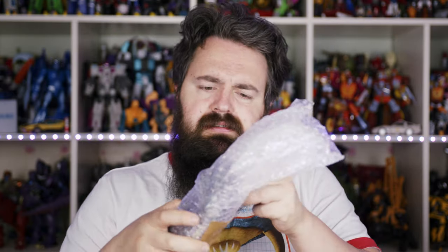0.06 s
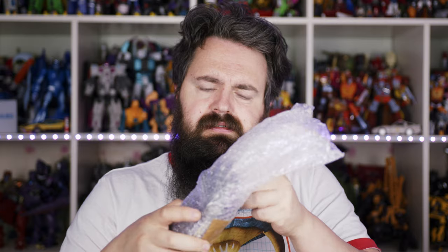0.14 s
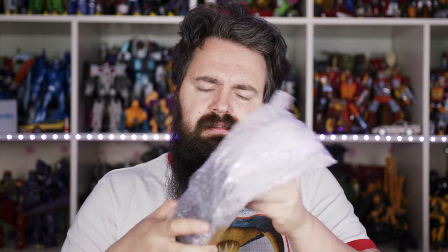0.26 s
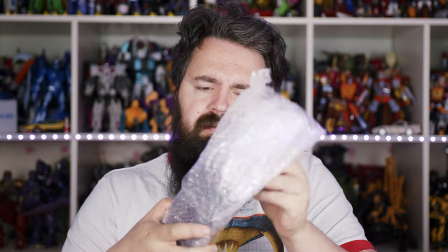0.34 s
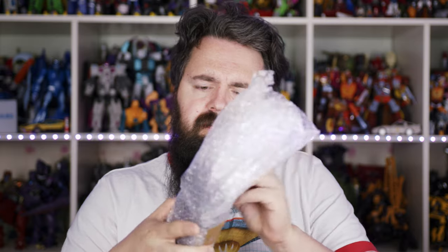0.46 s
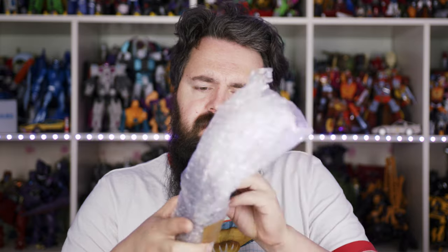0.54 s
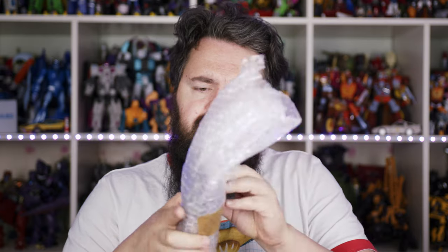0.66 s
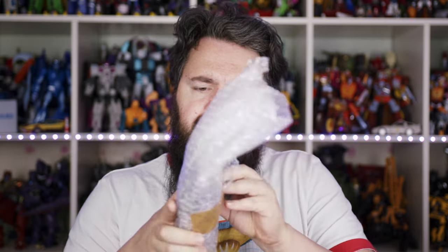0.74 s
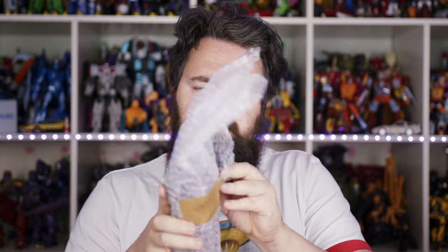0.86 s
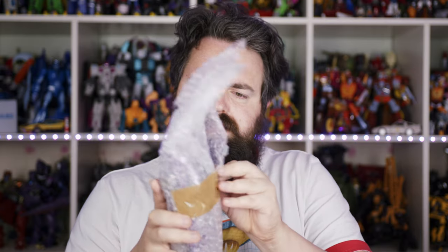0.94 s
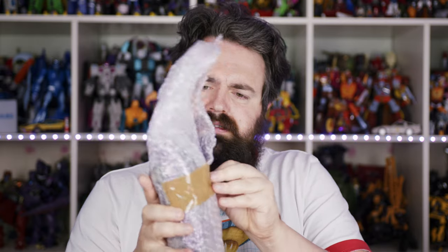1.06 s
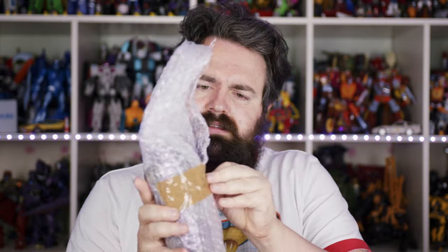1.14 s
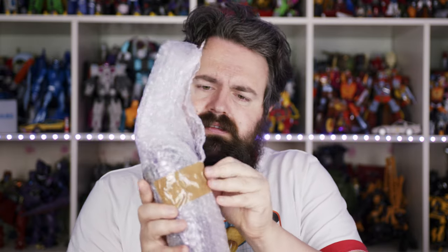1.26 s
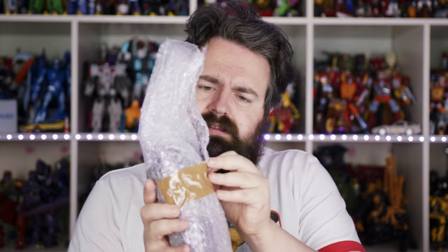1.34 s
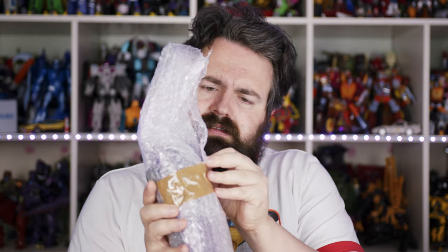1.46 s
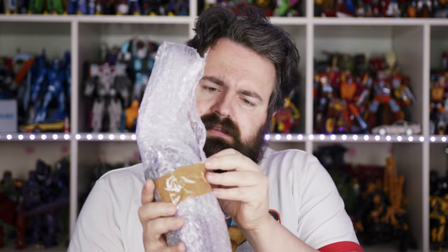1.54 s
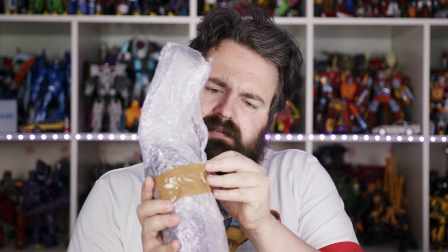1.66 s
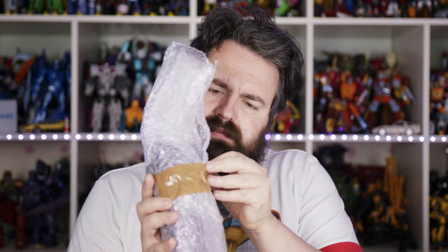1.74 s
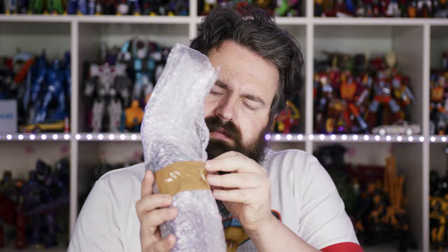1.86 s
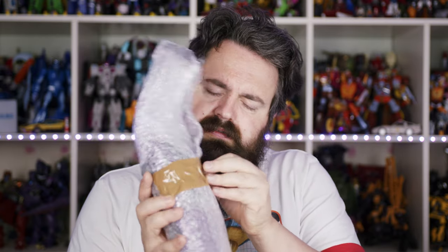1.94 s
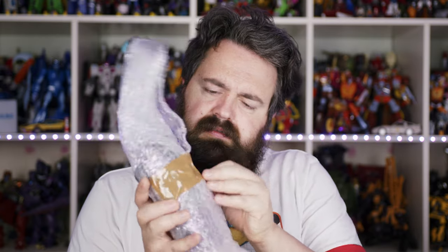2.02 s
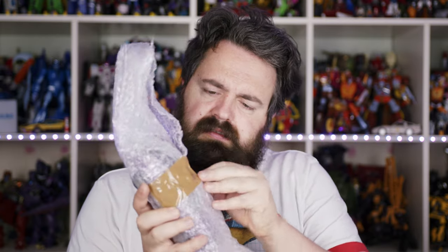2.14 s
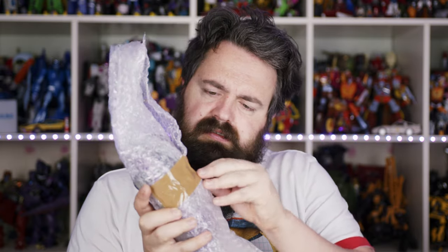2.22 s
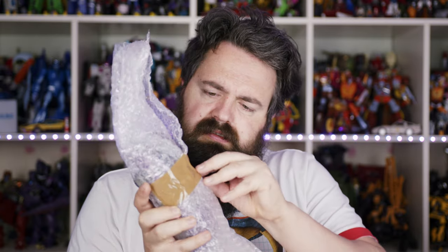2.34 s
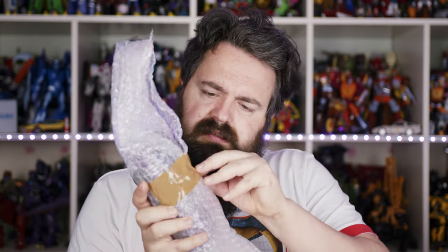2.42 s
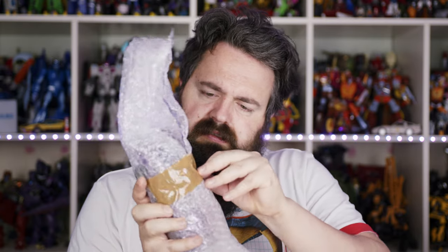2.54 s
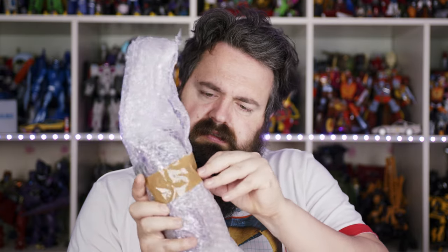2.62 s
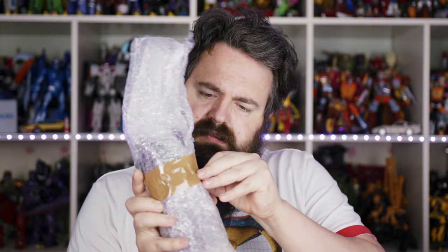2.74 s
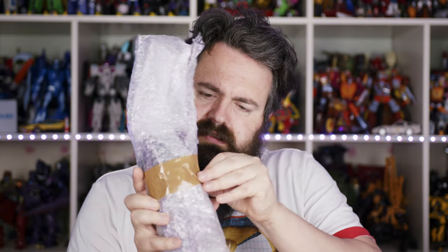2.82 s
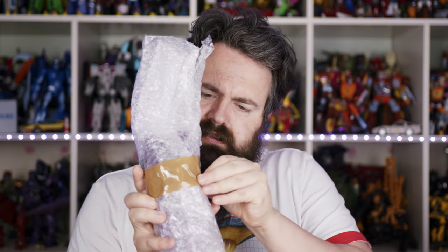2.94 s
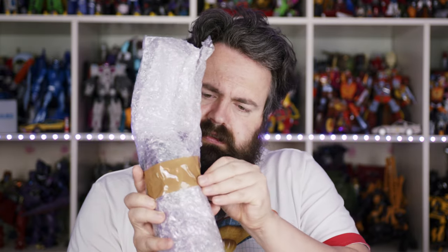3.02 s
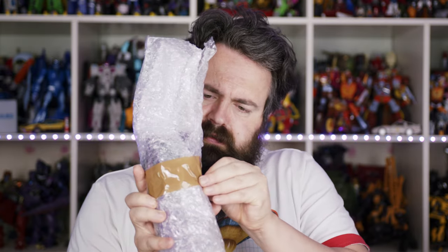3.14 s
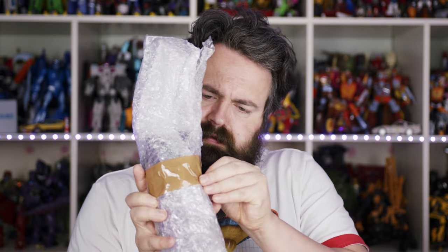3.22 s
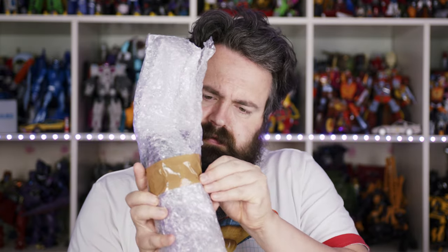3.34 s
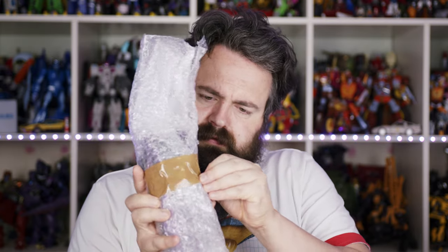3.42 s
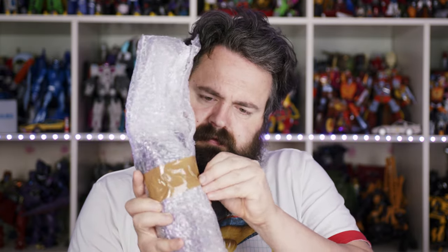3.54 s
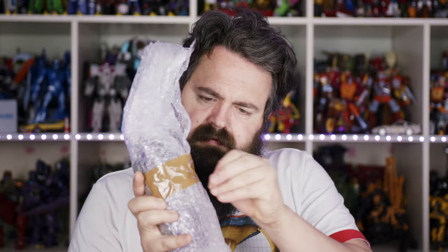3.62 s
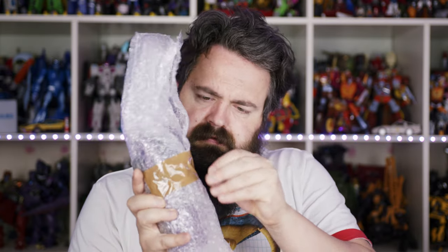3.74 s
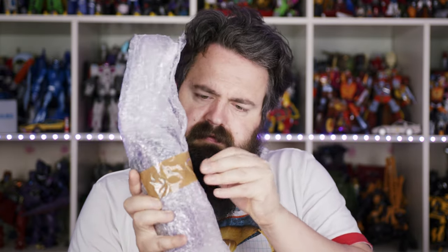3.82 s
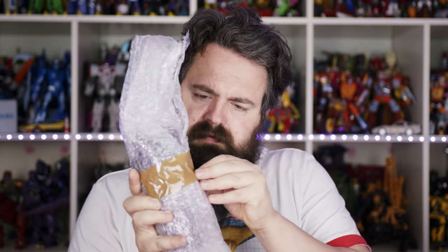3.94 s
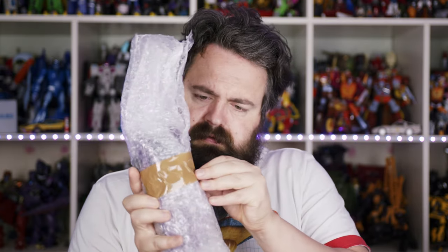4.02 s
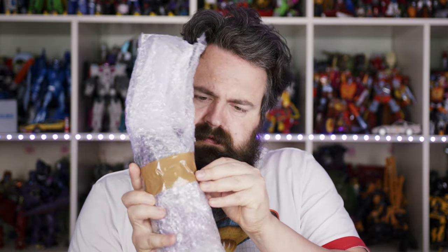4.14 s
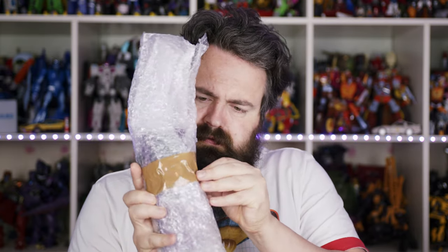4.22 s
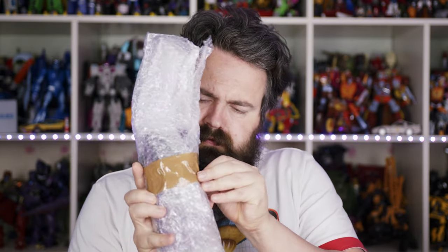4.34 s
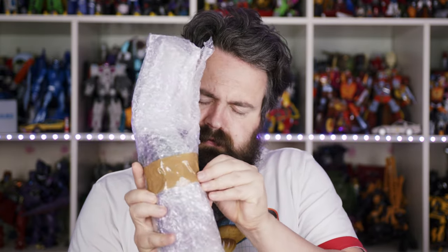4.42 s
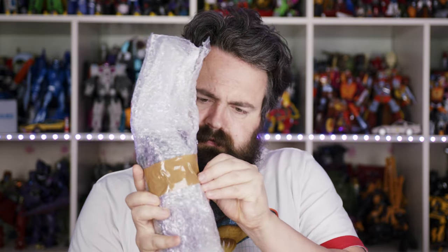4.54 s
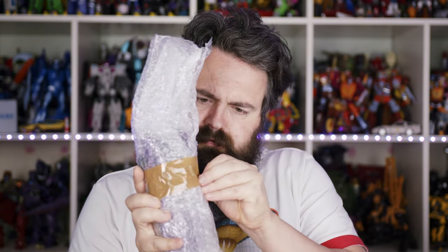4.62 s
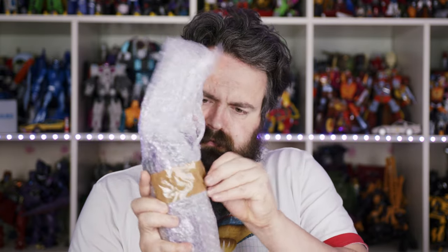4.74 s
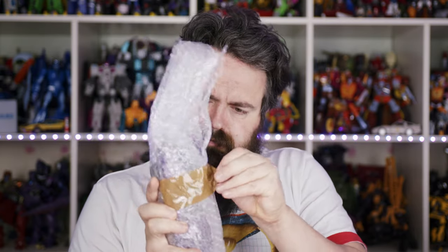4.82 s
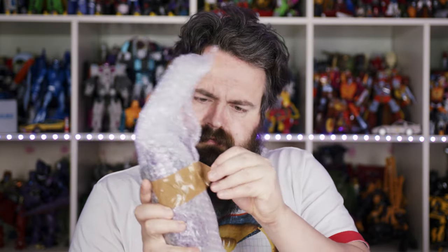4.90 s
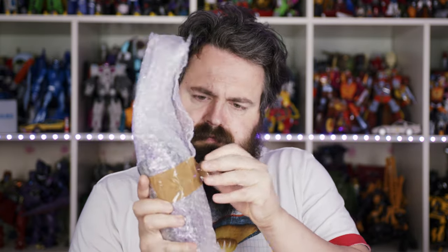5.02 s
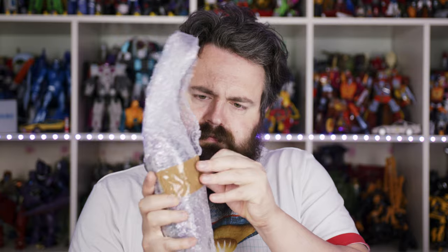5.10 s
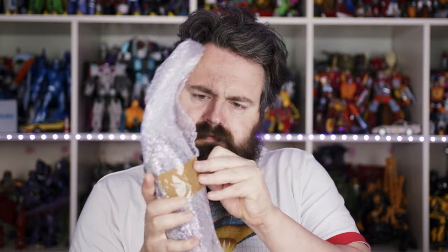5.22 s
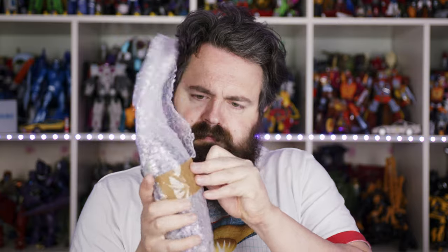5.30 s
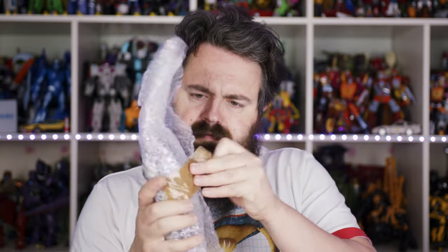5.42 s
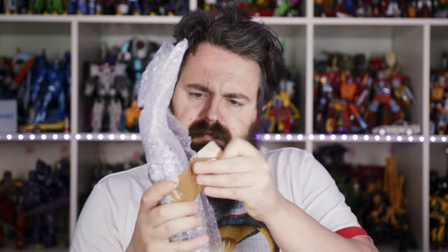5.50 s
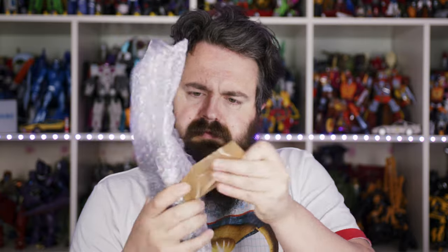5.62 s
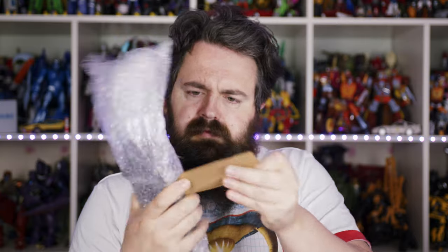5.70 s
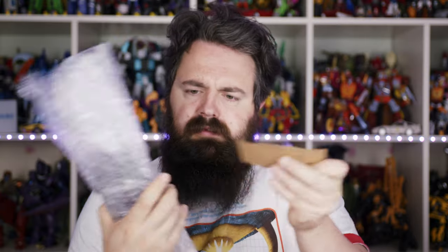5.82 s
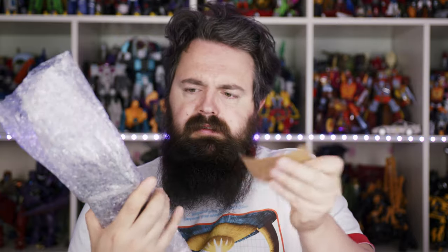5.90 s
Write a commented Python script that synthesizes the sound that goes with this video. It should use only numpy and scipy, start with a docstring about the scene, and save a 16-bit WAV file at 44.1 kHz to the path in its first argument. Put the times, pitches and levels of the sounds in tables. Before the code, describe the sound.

Close to the microphone in a small furnished room, hands turn a parcel of bubble wrap. Crisp film crinkles busily at first, then settles into lighter rustles, nail picking and dull fingertip taps. A single sharp snap breaks a quiet stretch, fiddling resumes, the tape gives briefly, and finally it rips away in loud, jerky bursts.

```python
"""Plastic film rustles and ticks, fingers tap, one sharp snap sounds, then packing tape tugs and rips.
Hands turn a toy rolled in bubble wrap and pick at its tape, close to a microphone in a small room.
Rustle is a crackle of many small flips blended with noise; creases and the snap are short impulses.
Taps and pats are decaying rings. The tape peels by stick and slip: cracks that drum on the wrap.
Scattering close by, room echoes, quiet room air and the rumble of moving arms surround these sounds."""
import sys
import numpy as np
from scipy import signal
from scipy.fft import rfft, irfft, next_fast_len
from scipy.io import wavfile
from scipy.ndimage import map_coordinates

SR = 44100
rng = np.random.default_rng(int(sys.argv[2]) if len(sys.argv) > 2 else 0)


def log_audio(samples):
    """Write samples as a 16-bit WAV file to the path given in sys.argv[1]."""
    # one column per channel
    frames = np.atleast_2d(samples).T
    # limit to full scale, then quantise
    limited = np.clip(frames, -1, 1)
    pcm = np.round(limited * 32767).astype(np.int16)
    wavfile.write(sys.argv[1], SR, pcm)


N = 262836


def amp(db):
    """Logarithmic level: decibels become an amplitude gain."""
    return 10 ** (np.asarray(db) / 20)


def unit(x):
    """Mean power: scale a steady sound to rms 1."""
    return x / np.sqrt(np.mean(x ** 2) + 1e-20)


def burst(x):
    """Impulse energy: scale a short sound to the energy of one millisecond at rms 1."""
    return x * np.sqrt(SR / 1000 / np.sum(x ** 2))


def along(points, hz):
    """Logarithmic frequency scale: interpolate (Hz, value) points on it."""
    point_hz, values = np.transpose(points)
    return np.interp(np.log(hz + 1), np.log(point_hz), values)


def filtered(x, gain):
    """Linear filtering: multiply the spectrum of x by a gain that depends on frequency."""
    padded = next_fast_len(N + SR // 2)
    hz = np.fft.rfftfreq(padded, 1 / SR)
    return irfft(rfft(x, padded) * gain(hz), padded)[:N]


def noise(colour):
    """Spectral shaping: white noise filtered to a colour, at rms 1."""
    return unit(filtered(rng.standard_normal(N), lambda hz: amp(along(colour, hz))))


def wobble(rate):
    """Slow random modulation: a smooth curve through `rate` random knots a second."""
    knots = rng.standard_normal(int(N * rate / SR) + 4)
    return map_coordinates(knots, [np.arange(N) * rate / SR])


def add(track, s, sound):
    """Superposition: mix a sound in at time s."""
    part = track[max(round(s * SR), 0):][:len(sound)]
    part += sound[:len(part)]


def crack(colour, ripple_db, bend=0.58, size=1024, count=24):
    """Minimum-phase impulse with dispersion; each fold of plastic has its own random resonances."""
    hz = np.fft.rfftfreq(size, 1 / SR)
    root_hz = np.sqrt(hz / hz[-1])
    ripple = map_coordinates(rng.standard_normal(count + 1), [count * root_hz], mode="nearest")
    # folding the cepstrum onto positive times makes the impulse causal
    cepstrum = irfft(np.log(amp(along(colour, hz) + ripple_db * ripple)))
    cepstrum[1:size // 2] *= 2
    cepstrum[size // 2 + 1:] = 0
    # bending waves in a thin sheet carry the treble faster than the bass
    lag = np.exp(-2j * np.pi * bend * root_hz)
    return burst(irfft(np.exp(rfft(cepstrum)) * lag))


def splinter(colour, span, after_db, count=3):
    """Cascading failure: a crack, then weaker ones within span seconds as neighbouring folds give way."""
    sound = crack(colour, ripple_db=2)
    for delay, strength in rng.random((count, 2)):
        gain = amp(after_db) * (2 * strength - 1)
        add(sound, delay * span, gain * crack(colour, ripple_db=3))
    return burst(sound)


def ring(hz, t60, wrap_db, wrap_hz=1220, size=2048):
    """Damped modes: a patch of sheet rings briefly and wakes the resonance of the air-filled wrap."""
    t = np.arange(size) / SR
    body_hz = wrap_hz * np.exp(0.17 * rng.standard_normal())
    patch = np.sin(2 * np.pi * hz * t) / hz
    body = amp(wrap_db) * np.sin(2 * np.pi * body_hz * t) / body_hz
    decay, onset = np.exp(-np.log(1000) * t / t60), 1 - np.exp(-t / 0.000077)
    # a small sheet radiates its change of motion, so little bass
    return burst(np.gradient((patch + body) * decay * onset))


def grains(colour, rate, spread_db, count=24):
    """Shot noise: a crackle of rms 1 from folds that flip at random moments and strengths."""
    out = np.zeros(N)
    folds = [crack(colour, ripple_db=4, size=512) for _ in range(count)]
    when, strength, pick = rng.random((int(rate * N / SR), 3)).T
    times, gains = when * N / SR, amp(spread_db * strength ** 2)
    for s, gain, k in zip(times.tolist(), gains, (pick * count).astype(int)):
        add(out, s, gain * folds[k])
    return unit(out)


def texture(colour, sliding, rate, spread_db):
    """Power crossfade: separate flips blend into a smooth swish as the film slides more."""
    flips = np.sqrt(1 - sliding) * grains(colour, rate, spread_db)
    return flips + np.sqrt(sliding) * noise(colour)


def shifting(x, response, block):
    """Time-varying convolution: each block meets a fresh response, since the parcel keeps moving."""
    out = np.zeros(N)
    for start in range(0, N, block):
        echo = response()
        echo = echo / np.linalg.norm(echo)
        add(out, start / SR, signal.fftconvolve(x[start:start + block], echo))
    return out


# Spectrum of the room air. Each row: frequency in Hz, relative level in dB per Hz.
FLOOR_COLOUR = [(20, 0), (60, 7.5), (180, 3.5), (350, -1), (1000, -8.5), (3000, -16.5), (9000, -32.5),
                (16000, -37.5)]
# Swings of the arms. Each row: peak time in seconds, rise time constant in seconds, level in dB.
ARM_SWINGS = [(0.381, 0.043, -63), (.65, 0.079, -58.5), (.82, 0.086, -54), (4.82, .04, -54.5),
              (5.49, .02, -51), (5.83, 0.066, -48.5)]
ARM_FALL_S = 0.05  # time constant of a swing's stop


def background():
    """Broadband ambient noise: quiet room air and the low rumble of moving arms."""
    t = np.arange(N) / SR
    swings = np.zeros(N)
    for s, rise, db in ARM_SWINGS:
        swings += amp(db) * np.exp(-((t - s) / np.where(t < s, rise, ARM_FALL_S)) ** 2)
    rumble = noise([(15, -6.0), (40, -5), (110, -9.0), (300, -20), (900, -37.5)])
    return amp(-66.5) * noise(FLOOR_COLOUR) + swings * rumble


MOVE_ATTACK_S, MOVE_RELEASE_S = 0.032, 0.042  # ramp up to the start, time constant of settling


def stroke(start, length):
    """Amplitude envelope of one move of the hands: attack before the start, hold, exponential release."""
    t = np.arange(N) / SR - start
    return np.clip(1 + t / MOVE_ATTACK_S, 0, 1) * np.exp(-np.maximum(t - length, 0) / MOVE_RELEASE_S)


# Moves of the hands on the wrap. Each row: start in seconds, length in seconds,
# level in dB before the layer shares, level of the nail ticks over the move in dB.
MOVES = [(0, 0.21, -54, -5), (.24, .06, -64, 4), (0.306, 0.043, -51, -4), (0.472, 0.43, -61, -3),
         (0.637, 0.15, -56, -2), (0.906, 0.093, -56.5, -1.5), (1.049, 0.21, -65.5, -1),
         (1.277, 0.045, -56.5, -1.5), (1.38, 0.47, -60, -3.5), (1.967, 0.078, -60, -8),
         (2.076, 0.2, -58.5, -5.5), (2.303, 0.13, -62.5, 2.5), (2.512, 0.053, -64, -2),
         (2.68, 0.2, -66, -2), (3.439, 0.16, -58.5, -2.5), (3.964, 0.14, -64, 0), (4.213, 0.018, -63, 0),
         (4.335, 0.12, -65.5, -11), (4.522, 0.13, -58.5, -2), (4.719, 0.13, -54, -2.5),
         (4.926, 0.17, -61.5, -2), (5.151, 0.11, -54.5, -4), (5.329, 0.61, -50.5, -1.5)]
HOLD_DB = -69.5  # floor of the effort: the wrap never lies quite still in the hands


def effort(levels_db):
    """Power summation: level in dB of all the moves together, over the stir of the held wrap."""
    power = amp(HOLD_DB) ** 2
    for (start, length, _, _), db in zip(MOVES, levels_db):
        power = power + (amp(db) * stroke(start, length)) ** 2
    return 10 * np.log10(power)


# Spectrum of fingernails picking at the tape. Each row: frequency in Hz, relative level in dB per Hz.
TICK_COLOUR = [(500, -29), (4000, -23), (7000, 2), (9700, 1.5), (11500, -4), (16000, -14.5)]
# Spectrum of the film's crinkle. Each row: frequency in Hz, relative level in dB per Hz.
FILM_COLOUR = [(200, -13), (1600, -0.5), (2600, 2), (4200, 2), (6500, -4.5), (9500, -13), (12000, -11),
               (16000, -21)]
# Spectrum of the bubbles' crumple. Each row: frequency in Hz, relative level in dB per Hz.
CRUMPLE_COLOUR = [(100, -34), (300, -15), (500, -1.5), (800, -3), (1200, 4.5), (1800, -9.5), (2800, -14.5),
                  (6000, -25)]
TICK_DB, CRINKLE_DB, CRUMPLE_DB = -6.5, -3.5, -5.5  # share of each layer in a move


def rustle():
    """Crackling noise of buckling film: nails tick on the tape, film crinkles, bubbles crumple lower."""
    _, _, level_db, nails_db = np.transpose(MOVES)
    move_db, tick_db = effort(level_db), effort(level_db + nails_db)
    sliding = np.interp(move_db, [-68, -58], [.12, .38])  # more motion, denser sound
    clumps_db = 1.5 * wobble(40)  # folds give way in small clusters
    ticks = amp(tick_db + TICK_DB) * texture(TICK_COLOUR, sliding, rate=190, spread_db=25.5)
    crinkle = amp(move_db + CRINKLE_DB) * texture(FILM_COLOUR, sliding, rate=900, spread_db=21.0)
    crumple = amp(move_db + CRUMPLE_DB) * texture(CRUMPLE_COLOUR, sliding, rate=250, spread_db=19)
    return amp(clumps_db) * (ticks + crinkle + crumple)


PATS_PER_S, PAT_HZ = 30, 1264  # mean rate, middle of a one-octave range of ring pitch
PAT_DB, PAT_SPREAD_DB = 3.5, 6  # level over the move, scatter either way


def pats():
    """Impact excitation: fingertips nudge single bubbles, harder as the hands work harder."""
    out = np.zeros(N)
    move_db = effort(np.array(MOVES)[:, 2])
    for when, strength, pitch in rng.random((int(PATS_PER_S * N / SR), 3)):
        db = move_db[int(when * N)] + PAT_DB + PAT_SPREAD_DB * (2 * strength - 1)
        pat = ring(PAT_HZ * 2 ** (pitch - .5), t60=.009, wrap_db=-14)
        add(out, when * N / SR, amp(db) * pat)
    return out


# Single creases that flip. Each row: start in seconds, crack level in dB.
CREASES = [(0.0018, -19), (0.078, -37), (0.1056, -33.5), (0.218, -39), (0.6643, -49), (0.975, -47.5),
           (1.8915, -47), (2.446, -49.5), (4.5589, -42), (4.6204, -42), (5.0654, -53.5), (5.3861, -37.5)]
# Spectrum of a crease's crack. Each row: frequency in Hz, relative level in dB per Hz.
CREASE_COLOUR = [(100, -11), (350, -11), (1300, -5.5), (2500, -1.5), (4000, 3), (6000, -0.5), (8000, -5),
                 (11000, -7), (16000, -24)]
CREASE_RING_DB, CREASE_HZ = -13, 1177  # the sheet's ring relative to the crack, and its pitch


def creases():
    """Snap-through buckling: a large crease flips with a crack and shakes the sheet around it."""
    out = np.zeros(N)
    for s, crack_db in CREASES:
        add(out, s, amp(crack_db) * splinter(CREASE_COLOUR, span=0.0011, after_db=-10.5))
        sheet = ring(CREASE_HZ, t60=0.0035, wrap_db=-21.0)
        add(out, s, amp(crack_db + CREASE_RING_DB) * sheet)
    return out


# Fingertips and nails on the padded parcel. Each row: start in seconds,
# level in dB before the knock and ring trims, ring pitch in Hz.
TAPS = [(0.2179, -43, 920), (0.321, -37.5, 990), (0.329, -40, 1220), (0.35, -43, 910), (0.6643, -37, 1290),
        (0.685, -38.5, 1150), (0.872, -42.5, 1230), (1.0612, -38.5, 1290), (1.0671, -36.5, 1050),
        (1.829, -39.5, 1360), (2.4463, -46, 1370), (2.801, -42.5, 1130), (2.857, -49, 1160),
        (3.046, -42.5, 470), (3.048, -40, 1350), (3.243, -48.5, 1190), (3.824, -48.5, 860),
        (3.961, -44.5, 1160), (3.979, -45.5, 1180), (4.125, -48.5, 1390), (4.319, -40.5, 1240),
        (4.715, -40, 1450), (4.747, -37.5, 636), (5.188, -39.5, 620), (5.93, -34, 1300)]
# Spectrum of a fingertip's dull knock. Each row: frequency in Hz, relative level in dB per Hz.
KNOCK_COLOUR = [(100, -9), (450, -0.5), (800, 7), (1200, 11), (2000, -9.5), (3000, -9), (7000, -33)]
TAP_RING_S = 0.013  # 60 dB decay time of a tap that rings at 1 kHz


def taps():
    """Constant-Q damping: soft contacts knock dully with a short ring; a low ring lasts longer."""
    out = np.zeros(N)
    for s, db, hz in TAPS:
        add(out, s, amp(db - 5) * splinter(KNOCK_COLOUR, span=0.00306, after_db=-3))
        add(out, s, amp(db - 2.5) * ring(hz, t60=TAP_RING_S * 1000 / hz, wrap_db=-6))
    return out


# The one sharp snap. The row: start in seconds, level in dB.
SNAP = (3.6268, -10.5)


def snap(colour):
    """Sudden release of tension: taut plastic lets go all at once, in one dispersed impulse."""
    out = np.zeros(N)
    start, db = SNAP
    add(out, start, amp(db) * crack(colour, ripple_db=0, bend=2.5))
    return out


def slip(tear, crack_db, ring_db, hz):
    """Elastic release: the glue lets go with a crack, and the released tape drums on the wrap."""
    sound = amp(ring_db - 1) * ring(hz * 0.947, t60=0.01, wrap_db=-20.0, size=1024)
    add(sound, 0, -amp(crack_db + 1.5) * tear)
    return sound


# The tape catches, then gives in one jerk. Each row: start in seconds, crack level in dB,
# ring level in dB, ring pitch in Hz, the last three before the trims in slip().
JERKS = [(4.8, -25, -26, 1350), (4.8258, -22.5, -18.5, 1220), (4.86, -30, -21, 1270),
         (5.4246, -22.5, -25, 1240), (5.4432, -20.5, -19.5, 860), (5.4612, -15, -17.5, 845),
         (5.4825, -9, -14, 1110), (5.545, -26.5, -22.5, 1360), (5.5506, -30, -25, 1030),
         (5.5647, -16, -12, 1120), (5.6226, -13.5, -13.5, 1480), (5.6414, -9.5, -7, 762),
         (5.6454, -19, -7.5, 694), (5.6529, -12, -6, 680), (5.6797, -16, -8.5, 1450),
         (5.7345, -14, -15, 564), (5.772, -17, -9.5, 1153), (5.8037, -19, -11, 1160)]
# Steady pulls on the tape. Each row: start in seconds, end in seconds, crack level in dB, ring level in dB,
# loss of level over the pull in dB, ring pitch in Hz, median rate in slips per second;
# levels and pitch are before the scatter and the trims in slip().
PULLS = [(4.802, 4.825, -31, -26.5, 13.5, 1190, 460), (4.831, 4.851, -26.5, -25, 4, 1240, 478),
         (4.865, 4.886, -39, -38, 9, 1300, 380), (5.451, 5.473, -26, -25, -1, 940, 400),
         (5.487, 5.513, -19, -19, 3.5, 1160, 374), (5.56, 5.628, -20.5, -16, -4.5, 986, 380),
         (5.6627, 5.723, -15, -13.5, 3, 900, 350), (5.723, 5.756, -15, -14.5, 6, 623, 550),
         (5.7587, 5.83, -20, -17, 9.5, 960, 367)]
# Spectrum of the tearing glue. Each row: frequency in Hz, relative level in dB per Hz.
TAPE_COLOUR = [(30, -40), (150, -8), (350, 0), (1200, -8.5), (2300, 6), (5000, 2), (7000, -0.5),
               (9400, -0.5), (10800, -5.5), (13000, -9.5), (16000, -19)]
STICK_SPREAD, PITCH_SPREAD = .35, .25  # scatter of sticking time and ring pitch, natural log units
STICK_DB = 6  # a slip is this much stronger for each e-fold of time that it stuck


def tape(count=80):
    """Stick-slip friction: the longer the tape sticks, the harder it lets go."""
    out = np.zeros(N)
    tears = [splinter(TAPE_COLOUR, span=.0008, after_db=-6) for _ in range(count)]
    for s, crack_db, ring_db, hz in JERKS:
        add(out, s, slip(tears[rng.integers(count)], crack_db, ring_db, hz))
    jerk_times = np.array(JERKS)[:, 0]
    for start, end, crack_db, ring_db, fading_db, hz, rate in PULLS:
        stick, pitch = np.clip(rng.standard_normal((2, count)), -2, 2)
        waits = np.exp(STICK_SPREAD * stick) / rate
        times = start + np.cumsum(waits) - waits[0]
        fade_db = fading_db * (times - start) / (end - start)
        swing_db = STICK_DB * STICK_SPREAD * stick - fade_db
        ring_hz = hz * np.exp(PITCH_SPREAD * pitch)
        for s, db, slip_hz, k in zip(times, swing_db, ring_hz, rng.permutation(count)):
            sound = slip(tears[k], crack_db + db, ring_db + db, slip_hz)
            # around a jerk the tape is slack for a moment
            if s < end and np.abs(s - jerk_times).min() > .0015:
                add(out, s, sound)
    return out


FRESH_DB = 0.5  # gain of the short strip's fizz
DULLING_DB_PER_S, DULLING_FROM_S = 24, 5.6  # how the fizz fades once the strip runs free


def dulled(x, corner_hz=9000):
    """Treble loss with length: the longer the freed strip of tape, the less fizz it gives off."""
    fizz = filtered(x, lambda hz: 1 / (1 + (corner_hz / (hz + 1)) ** 4))
    free_s = np.maximum(np.arange(N) / SR - DULLING_FROM_S, 0)
    fizz_db = FRESH_DB - DULLING_DB_PER_S * free_s
    return x + (amp(fizz_db) - 1) * fizz


def nearby(x, t60, size=1024):
    """Early scattering: rolled wrap, hands and chest return the sound within a few milliseconds."""
    t = np.arange(size) / SR
    fade = np.exp(-np.log(1000) * t / t60) * (t > .0005)
    return shifting(x, lambda: fade * rng.standard_normal(size), size)


# Spectrum of the room's answer. Each row: frequency in Hz, relative level in dB.
ROOM_COLOUR = [(60, -25.5), (250, 5), (550, 2), (1200, -0.5), (2200, 0.5), (4500, 1.5), (8000, -1),
               (11000, -3), (16000, -1.5)]
# Reverberation of the room. Each row: frequency in Hz, 60 dB decay time in seconds.
ROOM_T60 = [(150, 0.6), (600, 0.24), (2000, 0.32), (6000, 0.33), (14000, 0.29)]


def room(x, size=256, count=100):
    """Diffuse reverberation: a furnished room answers with a short tail whose bass lingers longest."""
    hz = np.fft.rfftfreq(size, 1 / SR)[:, None]
    t = np.arange(count) * size / 2 / SR
    fade = amp(along(ROOM_COLOUR, hz)) * np.exp(-np.log(1000) * t / along(ROOM_T60, hz))

    def tail():
        """Random phase: the many reflections of a diffuse field."""
        phases = np.exp(2j * np.pi * rng.random(fade.shape))
        return signal.istft(fade * phases, nperseg=size)[1]

    return shifting(x, tail, block=8192)


# Spectrum of the snap heard directly. Each row: frequency in Hz, relative level in dB per Hz.
SNAP_COLOUR = [(60, -22), (450, -5.5), (1800, -7.5), (2600, -10.5), (3400, -1.5), (4400, -3), (5100, -14),
               (6200, -25), (7600, -13.5), (9300, -15), (10200, -31), (13000, -23), (16000, -38)]
# Spectrum the snap sends into the room. Each row: frequency in Hz, relative level in dB per Hz.
SNAP_SPREAD = [(100, -31.5), (500, -2.5), (1500, -1), (2500, -4.5), (3800, -3.5), (5500, -6.5), (8000, -9),
               (10000, -19), (16000, -31.5)]


def scene():
    """Superposition of direct, scattered and reverberant sound: all the plastic shares one room."""
    handling = rustle() + pats() + creases() + taps()
    peel = dulled(tape())
    direct = handling + snap(SNAP_COLOUR) + peel
    echoes = room(amp(-10.5) * handling + amp(-13.5) * snap(SNAP_SPREAD) + amp(-10.5) * peel)
    scattered = amp(-9) * nearby(direct, t60=0.022)
    return (direct + scattered + echoes + background())[None]


TOP_HZ = 15950  # band limit


def record(dry):
    """Soft saturation and band limiting: round off the highest peaks, keep nothing from TOP_HZ up."""
    held = dry[0] / (1 + np.abs(dry[0] / .95) ** 6) ** (1 / 6)
    return filtered(held, lambda hz: hz < TOP_HZ)[None]


dry = scene()
out = record(dry)
log_audio(out)
```